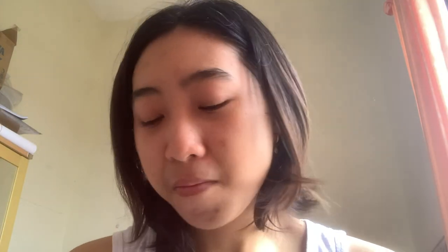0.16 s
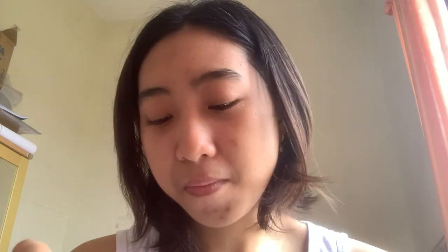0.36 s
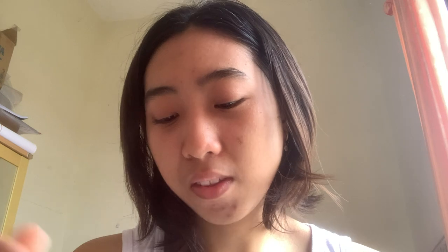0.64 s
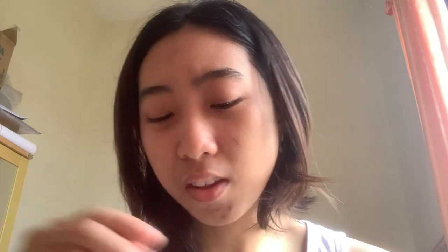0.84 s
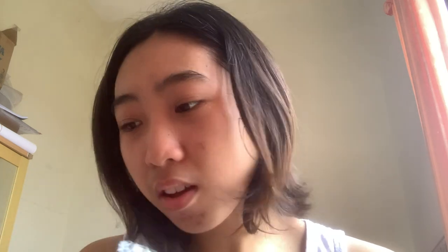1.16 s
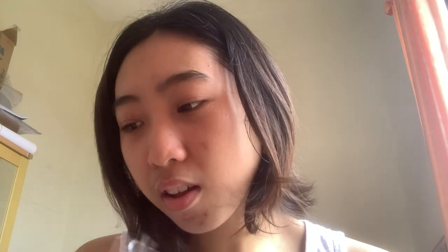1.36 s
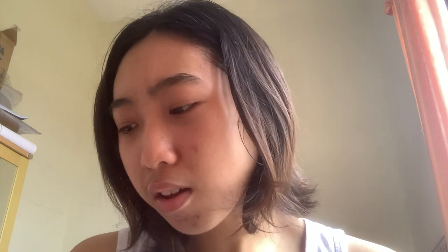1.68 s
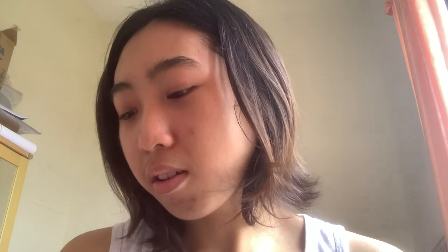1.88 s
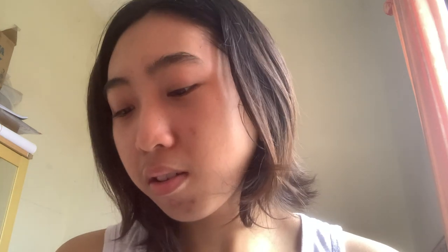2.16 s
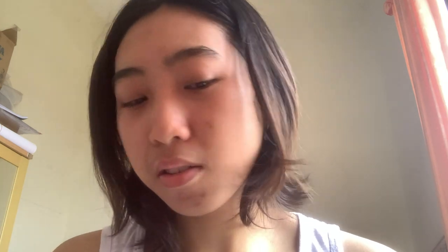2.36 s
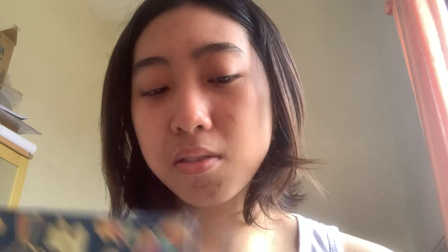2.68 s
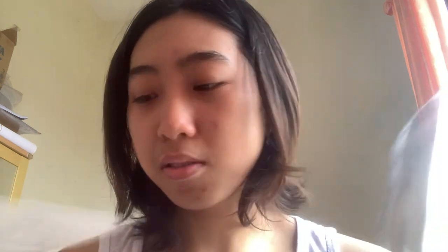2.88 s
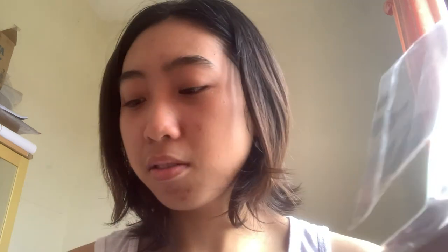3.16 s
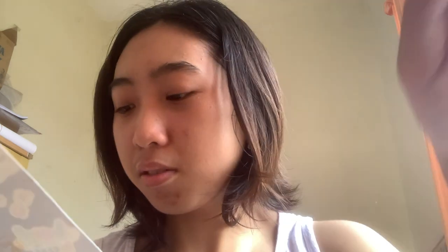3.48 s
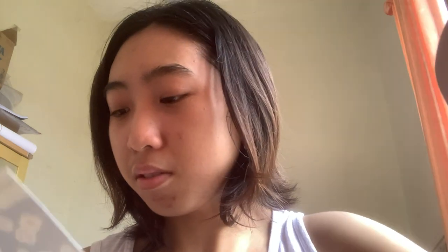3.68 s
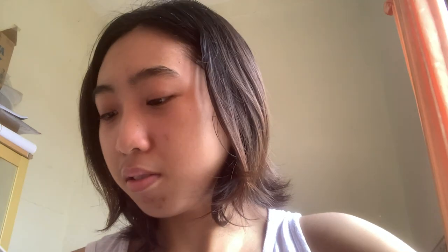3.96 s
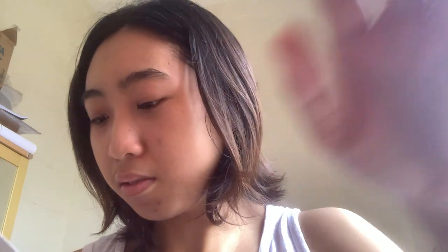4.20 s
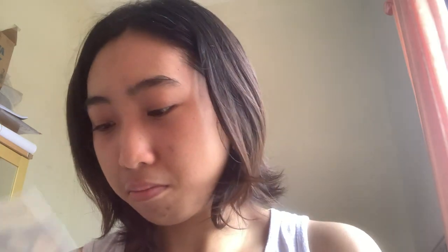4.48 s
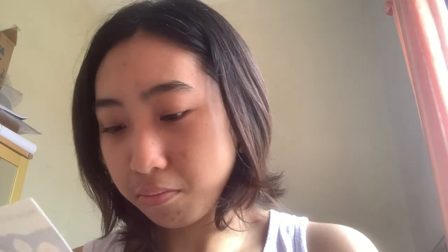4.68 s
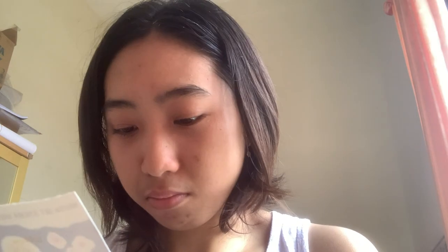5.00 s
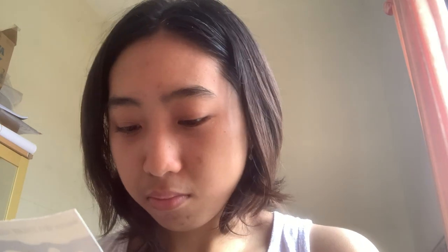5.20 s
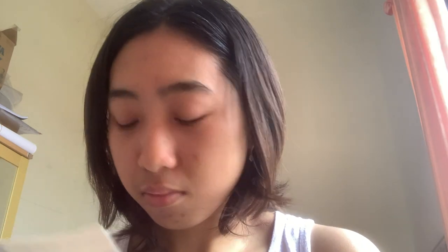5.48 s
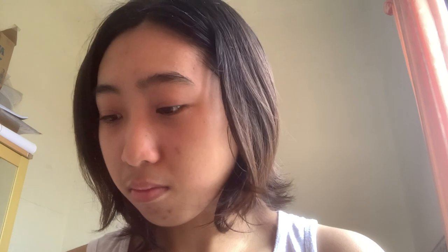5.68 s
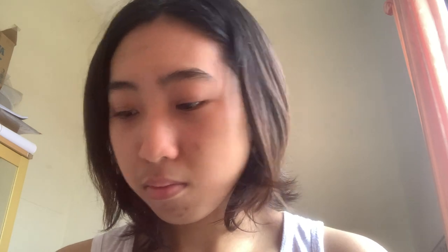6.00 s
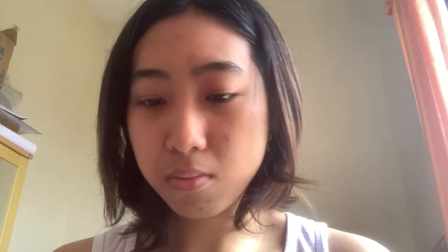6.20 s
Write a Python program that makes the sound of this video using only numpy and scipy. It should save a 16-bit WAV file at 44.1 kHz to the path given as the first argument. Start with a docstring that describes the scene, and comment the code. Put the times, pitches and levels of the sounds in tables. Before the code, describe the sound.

Close plastic sleeve tears and crinkles brightly, gets put aside to the right, leaving faint brushing and taps above a low rumble.

```python
"""Plastic sleeve torn open

Close up in a small room, quick pulls rip a sticky flap: dense noise slips through ringing modes.
Film crinkles as short damped pings and crackle; card knocks lower; a sticker sheet slides out as dense grain.
The sleeve is put aside to the right, and fingers tap (damped modes) and brush (soft grain) the sheet.
Below lie filtered-noise traffic and hiss, and sine tones for mains hum, a drone and three far engines."""
import sys
import numpy as np
from scipy import signal
from scipy.fft import rfft, irfft, next_fast_len
from scipy.io import wavfile
from scipy.ndimage import uniform_filter1d, map_coordinates

SR = 44100
rng = np.random.default_rng(int(sys.argv[2]) if len(sys.argv) > 2 else 0)


def write(x):
    x = np.atleast_2d(x).T
    wavfile.write(sys.argv[1], SR, np.round(np.clip(x, -1, 1) * 32767).astype(np.int16))


N = 279594

# colour of crackling film: frequency_hz, relative density_db (per Hz)
FILM_COLOUR = [(300, -27.5), (1200, -25.5), (2300, -9.5), (3200, -7.5), (4400, -6.5), (7300, 2), (9600, 3),
               (12000, -3.5), (15500, -4.5)]
# colour of the stiff card: frequency_hz, relative density_db (per Hz)
CARD_COLOUR = [(120, -20.5), (300, -7.5), (550, 2), (850, -1), (1200, -6.5), (1700, -3), (2400, -5.5),
               (2900, -13.5), (3700, -8), (9000, -31)]
TOP_HZ = 15900  # upper band limit
PULL_ATTACK_S, PULL_RELEASE_S = 0.0009, 0.002  # exponential time constants
LEFT_RIGHT = np.array([[.5], [-.5]])  # splits a left-right difference over both channels


def amp(db):
    """Decibels to amplitude."""
    return 10 ** (np.asarray(db) / 20)


def unit(x):
    """Scale x to rms 1."""
    return x / np.sqrt(np.mean(x ** 2) + 1e-20)


def along(points, hz):
    """Interpolate (Hz, value) points on a log-frequency axis."""
    point_hz, value = np.transpose(points)
    return np.interp(np.log(hz + 1), np.log(point_hz + 1), value)


def curves(rows):
    """Interpolate each column after the time to one value per sample."""
    time_s, *columns = np.transpose(rows)
    return [np.interp(np.arange(N) / SR, time_s, column) for column in columns]


def wobble(rate):
    """A smooth random curve with rate knots a second."""
    knots = rng.standard_normal(int(N * rate / SR) + 4)
    return map_coordinates(knots, [np.arange(N) * rate / SR])


def noise(size=N):
    """Two unrelated white noises."""
    return rng.standard_normal((2, size))


def filtered(x, response):
    """Multiply the spectrum of x by a complex response of frequency."""
    size = next_fast_len(N + SR // 2)
    return irfft(rfft(x, size) * response(np.fft.rfftfreq(size, 1 / SR)), size)[..., :N]


def coloured(x, spectrum, size=8192):
    """Causal minimum-phase filter with this spectrum that keeps the power of white noise."""
    gain = unit(amp(along(spectrum, np.fft.rfftfreq(size, 1 / SR))))
    cepstrum = irfft(np.log(gain))
    cepstrum[1:size // 2] *= 2  # fold the mirrored half forward in time
    cepstrum[size // 2 + 1:] = 0
    impulse_response = irfft(np.exp(rfft(cepstrum)))
    return signal.fftconvolve(x, impulse_response[None], axes=1)[:, :N]


def resonance(hz, centre_hz, width_hz):
    """Causal response of one mode, 1 at its centre."""
    return 1j * hz * width_hz / (centre_hz ** 2 - hz ** 2 + 1j * hz * width_hz)


def held(start, length, attack_s, release_s):
    """Rise exponentially up to the start, hold for the length, then decay exponentially."""
    t = np.arange(N) / SR - start
    exponent = np.minimum(t, 0) / attack_s - np.maximum(t - length, 0) / release_s
    return np.exp(np.maximum(exponent, -40))


def impulses(times, sizes):
    """A track with one spike of each size at each time."""
    return np.bincount(np.clip(np.asarray(times) * SR, 0, N - 1).astype(int), sizes, N)


def bursts(spikes, crack_t60, ring_t60, ring_db, size=4096):
    """Each spike becomes a noisy crack and a weaker, longer shiver."""
    t = np.arange(size) / SR
    power = amp(-60 * t / crack_t60) ** 2 + amp(ring_db - 60 * t / ring_t60) ** 2
    envelope = np.sqrt(np.abs(signal.fftconvolve(spikes ** 2, power)[:N]))
    return envelope * np.sign(noise())


def slips(rate, scatter, spread_db):
    """Spikes at an uneven rate with uneven sizes."""
    count = int(rate * N / SR)
    late, strength = rng.standard_normal((count, 2)).T
    times = ((np.arange(count) + scatter * late) / rate) % (N / SR)
    return impulses(times, amp(spread_db * np.clip(strength, -2, 2)))


def pings(s, gain, hz, life):
    """One short damped sine for each time, swelling to its peak at life and dying away."""
    t = np.arange(int(10 * life * SR)) / SR
    phase = rng.uniform(0, 2 * np.pi, (len(s), 2)).T[..., None]  # unrelated in the two channels
    envelope = gain[:, None] * t / life * np.exp(1 - t / life)
    waves = envelope * np.sin(2 * np.pi * hz[:, None] * t + phase)
    index = np.abs(s * SR).astype(int)[:, None] + np.arange(len(t))
    return np.array([np.bincount(index.ravel(), wave.ravel(), N)[:N] for wave in waves])


def pops(s, db, hz, life, detune, smear, count=6):
    """Each pop rings several patches of sheet, scattered in pitch, time and strength."""
    pitch, late, strength = rng.standard_normal((len(s), count, 3)).T
    share = amp(3.24 * strength) / np.linalg.norm(amp(2.5 * strength), axis=0)
    patch_hz = np.minimum(hz * np.exp(detune * pitch), TOP_HZ)
    return pings((s + smear * late).ravel(), (amp(db) * share).ravel(), patch_hz.ravel(), life)


def crackle(rate, low_hz, high_hz, life, spread_db):
    """Pings at random moments, each with its own pitch and size; rms 1."""
    count = int(rate * N / SR)
    when, pitch = rng.random((count, 2)).T
    gain = amp(spread_db * np.clip(rng.standard_normal(count), -2, 2))
    return unit(pings(when * N / SR, gain, low_hz + pitch * (high_hz - low_hz), life))


def creases(level_db, rate, spread_db):
    """Small creases give way at random moments, each with a pitch and size of its own."""
    count = int(rate * N / SR)
    when, pitch, strength = rng.random((count, 3)).T
    low_hz, high_hz = 2600, 14000
    local_db = level_db[(when * (N - 1)).astype(int)]
    db = local_db + spread_db * np.minimum(-np.log(1 - strength), 3)
    centre_hz = low_hz + pitch * (high_hz - low_hz)
    return pops(when * N / SR, db, centre_hz, life=0.00013, detune=0.12, smear=.0003, count=4)


def effort(grips):
    """Level in dB of overlapping grips; creases give way, so each sags while it is held."""
    attack_s, release_s = 0.0093, 0.022  # film crackles at once and settles slowly
    sag_db_per_s = 7.5
    t = np.arange(N) / SR
    power = 0
    for start, length, db in grips:
        sagging_db = db - sag_db_per_s * np.clip(t - start, 0, length)
        power = power + (amp(sagging_db) * held(start, length, attack_s, release_s)) ** 2
    return 10 * np.log10(power)


def tone(hz, waver):
    """A sine of rms 1 whose phase wanders a little."""
    phase = 2 * np.pi * np.cumsum(hz * np.ones(N)) / SR
    return np.sqrt(2) * np.sin(phase + waver * wobble(4.4))


def room(x):
    """Bare walls: each frequency of a noise tail dies at its own speed."""
    # decay of the room: frequency_hz, t60_s
    decay_times = [(200, 0.2), (2000, 0.55), (8000, 0.44), (15000, 0.397)]
    hz, t, z = signal.stft(noise(SR // 2), SR, nperseg=256)
    decay = amp(-60 * t / along(decay_times, hz)[:, None])
    tail = signal.istft(z * decay, SR, nperseg=256)[1]
    return signal.fftconvolve(x, tail / np.linalg.norm(tail[0]), axes=1)[:, :N]


def desk(x, count=9):
    """The desk and nearby things return weak copies within a few milliseconds."""
    delay_s, gain = rng.uniform(.0008, .009, count), rng.standard_normal(count)
    gain = gain / np.linalg.norm(gain)
    echoes = np.bincount(np.abs(delay_s * SR).astype(int), gain)
    return signal.fftconvolve(x, echoes[None], axes=1)[:, :N]


def ports(x):
    """Shared and unshared parts reach two microphone ports, differing in phase and level by frequency."""
    # likeness of the ports: frequency_hz, coherence (limited to 0-1 below)
    likeness = [(150, 1.5), (300, 0.42), (500, 0), (1000, 0.06), (1600, 0.3), (2400, 0), (6400, 0),
                (7300, 0.94), (9000, 0.8), (13000, 2.8), (14000, 1.2), (15000, 0.5)]
    # phase between the ports: frequency_hz, left_lead_rad (negative: left lags)
    phase_lead = [(50, .2), (130, .2), (250, 0), (650, -.9), (1000, 0), (1700, -.5), (2500, -.2),
                  (3200, -1.0), (3900, -.6), (5000, -2.4), (5900, -2.9), (6500, -3.85), (7300, -3.9),
                  (9200, -3.14), (11000, -1.8), (13300, -.15), (16000, .5)]
    # level between the ports: frequency_hz, left_minus_right_db
    balance = [(60, 1.5), (120, 4), (380, 2), (700, -2.5), (1300, -0.5), (4400, -1), (9000, 0)]

    def blend(hz):
        angle = np.arccos(np.clip(along(likeness, hz), 0, 1)) / 2
        return np.array([np.cos(angle), np.sin(angle)])

    def offset(hz):
        level = amp(LEFT_RIGHT * along(balance, hz))
        return level * np.exp(1j * LEFT_RIGHT * along(phase_lead, hz))

    shared, apart = filtered(x, blend)
    return filtered(np.array([shared + apart, shared - apart]), offset)


def to_the_right(x):
    """Below the treble, sound from the side reaches the right port first and louder."""
    # level between the ports: frequency_hz, left_minus_right_db
    side_balance = [(300, -9.5), (800, -1.5), (5300, -2.5), (6500, 0)]
    delay_s = .00036

    def offset(hz):
        lag = np.minimum(2 * np.pi * hz * delay_s, 4 * np.pi)  # whole turns above the limit: no lag
        return amp(LEFT_RIGHT * along(side_balance, hz)) * np.exp(-1j * LEFT_RIGHT * lag)

    return filtered(x, offset)


def ambience():
    """Filtered noise: traffic rumble ebbs and comes nearer, and a faint hiss partly follows it."""
    # traffic: time_s, rumble_db
    traffic = [(.15, -40), (.9, -37), (3.3, -38.5), (4.15, -40), (5.5, -37.5), (6.3, -36.5)]
    # colour of the rumble: frequency_hz, relative density_db (per Hz)
    rumble_colour = [(20, -46.5), (36, -16.5), (48, 0), (60, -4.5), (85, 1.5), (105, -2), (145, -3),
                     (180, -10.5), (250, -16), (350, -23), (600, -31.5), (1100, -45.5), (3000, -78.5)]
    # colour of the hiss: frequency_hz, relative density_db (per Hz)
    hiss_colour = [(300, -7.5), (1100, -5.5), (1700, -1), (2300, 2.5), (2900, -3), (3600, -11), (5500, -20),
                   (8000, -17), (11500, -21.5), (15500, -32.5)]
    hiss_base_db, hiss_follows = -67, .6  # the second is dB of hiss per dB of rumble
    rumble_db, = curves(traffic)
    hiss_db = hiss_base_db + hiss_follows * (rumble_db - rumble_db.mean()) + 0.73 * wobble(5)
    rumble = amp(rumble_db) * coloured(noise(), rumble_colour)
    return rumble + amp(hiss_db) * coloured(noise(), hiss_colour)


def engine(track):
    """Sines at multiples of a far engine's firing rate, dulled by the walls."""
    # engine orders: multiple_of_firing_rate (ratio), relative level_db
    orders = [(1, -1), (2, -1), (3, -6.5), (3.5, -2), (5, -2)]
    # what the walls let through: frequency_hz, gain_db
    walls = [(45, -14.5), (66, -0.5), (85, -0.5), (140, 1.5), (175, -2.5), (240, -10.5), (340, -18.5),
             (450, -22.5)]
    firing_hz, level_db = curves(track)
    total = np.zeros(N)
    for order, order_db in orders:
        hz = order * firing_hz
        total += amp(level_db + order_db + along(walls, hz)) * tone(hz, waver=.3)
    return total


def hum():
    """Wavering sines make mains hum and a drifting drone; three far engines join them."""
    # drone that swells and recedes: time_s, pitch_hz, level_db (before its sway)
    drone_track = [(.2, 118, -53), (.5, 119, -41), (1.0, 122, -47.5), (1.45, 123, -35), (1.75, 123, -47),
                   (2.05, 126, -39.5), (3.05, 124, -41), (3.8, 123, -49.5), (4.3, 119, -44),
                   (6.3, 119, -53)]
    # far engine running on and fading: time_s, firing_hz, level_db (before orders and walls)
    passing_engine = [(0, 80.2, -53.5), (.5, 81.89, -44.5), (.9, 83.83, -45.5), (1.2, 86, -47.5),
                      (2.2, 87.57, -46), (3.1, 86.68, -44.5), (3.5, 83.27, -49.5), (4.5, 83.1, -51),
                      (4.9, 82.5, -68)]
    # far engine pulling away, same columns: time_s, firing_hz, level_db
    leaving_engine = [(4.3, 46.23, -55), (4.5, 52.89, -43.5), (4.65, 67.38, -43.5), (4.8, 77.86, -42),
                      (5.0, 84.6, -43), (5.3, 85.34, -52.5), (6.34, 85.34, -49)]
    # far engine at a nearly steady speed, same columns: time_s, firing_hz, level_db
    cruising_engine = [(4.6, 63.65, -55.5), (4.95, 65.86, -56), (5.4, 67.54, -39.5), (6.34, 69.26, -46)]
    drone_hz, drone_db = curves(drone_track)
    drone = amp(drone_db + 3.5 * wobble(5.5)) * tone(drone_hz, waver=0.15)
    mains_tones = tone(49.5, waver=0.69) + amp(-4) * tone(99, waver=0.94)
    mains = amp(-44 + 5.5 * wobble(2.7)) * mains_tones
    engines = engine(passing_engine) + engine(leaving_engine) + engine(cruising_engine)
    return np.array([mains + drone + engines, np.zeros(N)])  # all in the shared part


def taps(size=4096):
    """A fingertip gives a hard nail click and damped modes of the stiff sheet, weighted by pitch."""
    # taps: time_s, knock_db (before mode and mix gains), centre_hz, click_db
    tap_events = [(4.5291, -28.5, 948.5, -33.5), (6.0806, -35.5, 1915, -52), (6.102, -31.5, 1643, -45.5)]
    # modes of the sheet: frequency_hz, relative level_db, t60_s
    sheet_modes = [(570, -3.5, 0.034), (1063, -2.5, 0.015), (1602, -3, 0.013), (2016, -2, 0.017),
                   (2520, -13.5, 0.011)]
    # colour of the nail's click: frequency_hz, relative density_db (per Hz)
    nail_colour = [(300, -8.5), (900, 2.5), (2200, 2.5), (3700, -13), (5500, -7.5), (9000, -18),
                   (15500, -13.5)]
    reach_octaves = 1.0  # how far around its centre a tap excites the sheet
    t = np.arange(size) / SR
    s, knock_db, centre_hz, click_db = np.transpose(tap_events)
    knock = np.zeros(N)
    for hz, db, t60 in sheet_modes:
        weight = amp(knock_db + db) * np.exp(-(np.log2(hz / centre_hz) / reach_octaves) ** 2)
        ring = amp(-60 * t / t60) * np.sin(2 * np.pi * hz * t)
        knock += signal.fftconvolve(impulses(s, weight), ring)[:N]
    click = bursts(impulses(s, amp(click_db)), crack_t60=.003, ring_t60=.03, ring_db=-23.5)
    return knock * amp([[-4], [-14]]) + coloured(click, nail_colour)  # knock mostly shared


def slides():
    """Rubbing surfaces: slips so dense that they hiss; each stroke gathers speed and stops sooner."""
    # sheet on film, then fingertips on sheet: fastest_s, run_up_s, level_db (before mix gains)
    strokes = [(2.45, 0.024, -53.5), (2.67, 0.21, -36), (5.505, 0.06, -67), (5.785, 0.035, -70.5)]
    # swishes of the sheet turned in the hands: start_s, length_s, level_db (before smoothing)
    swish_events = [(4.21, 0.022, -70), (5.29, 0.045, -74), (5.45, .065, -66), (5.765, 0.03, -73),
                    (5.86, 0.035, -70.5), (6.05, .07, -71.5), (6.24, 0.033, -77)]
    # colour of the swish: frequency_hz, relative density_db (per Hz)
    swish_colour = [(500, -10), (1500, 3.5), (3000, -3.5), (6000, -1), (7500, -2), (10000, -13),
                    (15500, -18)]
    # colour of the brushing: frequency_hz, relative density_db (per Hz)
    finger_colour = [(500, 1), (1500, -8.5), (2300, -24), (2900, -17.5), (3800, -5), (5000, -7),
                     (7000, -0.5), (11000, -0.5), (13000, -2.5), (15500, -3)]
    stop_share = 0.36  # stopping time as a share of the run-up
    t = np.arange(N) / SR
    stroke = np.zeros(N)
    for fastest_s, run_up, db in strokes:
        span = np.where(t < fastest_s, run_up, stop_share * run_up)
        stroke += amp(db) * np.exp(-((t - fastest_s) / span) ** 2)
    grain = crackle(rate=5000, low_hz=606, high_hz=15750, life=0.00017, spread_db=2.5)
    rub = stroke * amp(1.0 * wobble(70)) * grain
    turning = uniform_filter1d(amp(effort(swish_events)), size=2600)  # gradual start and stop
    swish = coloured(turning * amp(1.8 * wobble(60)) * grain, swish_colour)
    catching = amp(-16.5 + 5 * wobble(55))  # the card catches and frees itself
    return amp(-1.5) * coloured(rub, finger_colour) + catching * coloured(rub, CARD_COLOUR) + swish


def flaps():
    """The stiff card bows or is tapped: a dull, quickly damped knock with a papery slap."""
    # card knocks: time_s, knock_db (before part gains), centre_hz, bow_db (whole card bending)
    card_events = [(.117, -12.5, 2100, -38), (.211, -28.5, 2142, -48.5), (.269, -18.5, 1736, -25.5),
                   (0.287, -30.5, 696, -30), (.33, -25, 1890, -47.5), (0.342, -26, 1790, -44),
                   (0.355, -20, 1966, -42), (0.43, -20.5, 1672, -29), (.447, -26.5, 800, -29),
                   (.484, -25.5, 1030, -32), (.502, -29, 750, -35.5), (0.993, -31.5, 808, -39),
                   (1.243, -24, 1390, -33.5), (1.782, -31.5, 1500, -44), (1.81, -21, 1000, -37),
                   (1.927, -29.5, 650, -32.5), (2.029, -23, 1580, -32), (2.08, -31.5, 1724, -44.5),
                   (2.109, -33.5, 1790, -45), (3.684, -31.5, 1780, -30), (3.711, -28, 1940, -41),
                   (3.809, -32, 1700, -42), (6.077, -33, 1700, -58)]
    s, knock_db, hz, bow_db = np.transpose(card_events)
    s = s + .001  # the card gives way just after the touch
    knock = pops(s, knock_db - 4.0, hz, life=0.0006, detune=.24, smear=0.0017, count=12)
    slap_spikes = impulses(s, amp(knock_db - 9.0))
    slap = bursts(slap_spikes, crack_t60=0.015, ring_t60=0.12, ring_db=-10.5)
    bow = pops(s, bow_db, 470, life=0.0012, detune=0.39, smear=.002)
    return knock + bow + coloured(slap, CARD_COLOUR)


def rustle():
    """Worked film sheds fine crackle and separate small pops in fits and starts; the card crumples lower."""
    # grips of the hands: start_s, length_s, rustle_db, crumple_db (both before mix gains)
    hand_grips = [(0.285, 0.1, -42, -50), (0.422, 0.072, -34.5, -39), (0.551, 0.075, -41.5, -48),
                  (0.701, .01, -54, -53.5), (0.994, 0.023, -41, -46.5), (1.075, 0.25, -50, -54.5),
                  (1.342, 0.16, -50.5, -55.5), (1.512, 0.094, -60.5, -57.5), (1.639, 0.079, -48.5, -53.5),
                  (1.749, 0.058, -43, -47), (1.856, 0.19, -51.5, -59), (1.996, 0.2, -47.5, -54),
                  (2.224, 0.082, -48.5, -58.5), (2.343, 0.096, -41, -50.5), (2.512, 0.27, -46, -55.5),
                  (2.818, 0.046, -49, -62), (3.06, 0.038, -63, -60.5), (3.268, 0.2, -53.5, -62.5),
                  (3.654, 0.012, -50, -55), (3.688, 0.058, -53, -53), (3.875, 0.012, -49, -47.5),
                  (3.965, 0.009, -68, -54.5)]
    # slack sleeve creeping between moves: start_s, length_s, level_db (before mix gains)
    creep_events = [(2.9, 0.27, -65), (3.22, 0.2, -66.5), (3.52, 0.079, -64.5)]
    grips = np.array(hand_grips)
    fits_db = 3.5 * wobble(45)
    film_db = effort(grips[:, :3]) + fits_db
    body_db = effort(np.delete(grips, 2, axis=1)) + 0.26 * fits_db + 2.5 * wobble(70)
    creep_db = effort(creep_events)
    fine = crackle(rate=3900, low_hz=988, high_hz=15600, life=0.00018, spread_db=1.5)
    tick_spikes = slips(rate=97, scatter=0.89, spread_db=2.5)
    ticks = unit(bursts(tick_spikes, crack_t60=0.0024, ring_t60=0.017, ring_db=-12))
    crumple = crackle(rate=1500, low_hz=200.1, high_hz=3870, life=0.00064, spread_db=2.5)
    film = (amp(film_db) + amp(creep_db)) * amp(-2.5) * (fine + ticks)
    film += creases(film_db + 2.5, rate=120, spread_db=4.5)
    body_level = amp(body_db) + amp(creep_db - 1.5)  # slow creeping also crumples low
    body = body_level * (crumple + amp(-11.0) * ticks)
    return coloured(film, FILM_COLOUR) + amp(-6.0) * coloured(body, CARD_COLOUR)


def snaps():
    """A crease pops with a bright tick amid a ragged run of smaller ones, and shakes the sheet around it."""
    # loudest creases: time_s, snap_db (before part gains), centre_hz, flex_db (flexing sheet)
    crease_events = [(.213, -20.5, 9000, -39), (.232, -13.5, 6960, -22.5), (.3305, -19.5, 11440, -41.5),
                     (.347, -16, 10880, -32.5), (0.3555, -7, 12520, -32), (0.365, -19, 7010, -38),
                     (.418, -16, 12000, -42), (0.4249, -10, 6916, -29), (0.4293, -17, 10980, -34),
                     (0.433, -6.5, 9130, -23.5), (0.4383, -4.5, 10010, -28), (0.4422, -5, 9400, -18),
                     (0.466, -11.5, 10950, -30.5), (0.4758, -12, 10150, -32), (0.4792, -12, 11930, -33),
                     (0.4947, -14.5, 9060, -34.5), (.5127, -12, 11630, -35), (.546, -16, 11430, -32.5),
                     (0.5747, -18.5, 12970, -36), (.5952, -19, 9120, -35.5), (0.6, -17.5, 10300, -26.5),
                     (0.6141, -16.5, 9940, -44), (0.6242, -7, 10150, -30.5), (0.698, -29, 7980, -40.5),
                     (0.7483, -23.5, 10800, -45.5), (0.9919, -15, 7170, -27.5), (1.004, -19, 6990, -28),
                     (1.0226, -15, 8810, -28.5), (1.0506, -18.5, 10950, -51.5),
                     (1.0608, -21.5, 11680, -50.5), (1.087, -16, 9850, -49.5), (1.1331, -11.5, 7600, -42),
                     (1.1672, -20.5, 8540, -36.5), (1.2081, -23, 11970, -55), (1.2473, -28, 4664, -38),
                     (1.331, -15.5, 8950, -36), (1.3356, -17, 5900, -27.5), (1.3461, -22.5, 8726, -58.5),
                     (1.4066, -19.5, 8660, -40.5), (1.4197, -19, 10700, -48), (1.5282, -25, 12300, -54),
                     (1.5347, -16, 8820, -37.5), (1.556, -18.5, 12400, -56), (1.5842, -16, 9130, -57.5),
                     (1.6739, -19.5, 10680, -48.5), (1.7549, -14.5, 7050, -35.5),
                     (1.7614, -31.5, 4930, -29), (1.7675, -5.5, 10250, -28), (1.8109, -21, 5040, -22),
                     (1.821, -15.5, 9080, -36), (1.9181, -20.5, 9700, -52.5), (1.9245, -18, 10650, -34),
                     (1.9454, -23.5, 10200, -43.5), (1.9924, -17, 11240, -28.5),
                     (2.0233, -11.5, 8140, -37.5), (2.0316, -17, 7300, -19), (2.0427, -13.5, 11430, -47.5),
                     (2.1265, -21.5, 9800, -51), (2.143, -15.5, 9870, -46.5), (2.1789, -16.5, 7060, -44),
                     (2.1847, -17, 7850, -54), (2.2577, -11, 8200, -28.5), (2.3231, -16.5, 10900, -39),
                     (2.3509, -20, 13000, -50), (2.356, -16, 11000, -46), (2.3654, -12.5, 10670, -56),
                     (2.3707, -18.5, 9890, -40.5), (2.3808, -29, 11000, -43.5), (2.3917, -8, 11520, -36.5),
                     (2.398, -10.5, 9000, -31), (2.411, -11, 7460, -34.5), (2.428, -13.5, 9200, -38),
                     (2.509, -19, 13000, -31.5), (2.7264, -19, 10950, -42.5), (2.7724, -20, 6600, -38),
                     (2.8249, -18, 10050, -55), (2.8343, -20.5, 8600, -34), (2.8685, -25.5, 5770, -40.5),
                     (2.9506, -29.5, 7240, -41.5), (3.043, -32.5, 9700, -36), (3.0701, -24, 7600, -53.5),
                     (3.0883, -27.5, 8300, -56.5), (3.237, -38.5, 6760, -43), (3.275, -23, 7820, -51),
                     (3.2904, -31, 10000, -56), (3.296, -15.5, 12100, -45), (3.3535, -15, 10000, -48),
                     (3.3911, -15.5, 10400, -33.5), (3.4242, -19.5, 10680, -36), (3.4342, -22, 9800, -40),
                     (3.6435, -28, 6000, -38), (3.659, -22, 11050, -46), (3.6753, -20, 10050, -44),
                     (3.683, -8.5, 8200, -38.5), (3.6863, -15.5, 5140, -28), (3.713, -25, 4520, -37),
                     (3.7445, -15, 5160, -39), (3.7825, -22, 8300, -37), (3.8084, -22, 6800, -44),
                     (3.828, -27.5, 5100, -48.5), (3.8864, -24, 6200, -46), (3.8909, -23, 6400, -36.5),
                     (6.1, -37.5, 11100, -56)]
    s, snap_db, hz, flex_db = np.transpose(crease_events)
    tick = pops(s, snap_db - 2.5, hz, life=.0001, detune=0.3, smear=.0002)
    crack_spikes = impulses(s, amp(snap_db - 13.5))
    crack = bursts(crack_spikes, crack_t60=0.0036, ring_t60=0.022, ring_db=-4.5)
    run = pops(s, snap_db - 9.5, hz, life=0.00025, detune=0.092, smear=.0006)
    neighbours = pops(s, snap_db - 18.5, hz, life=.0001, detune=0.91, smear=0.018, count=4)
    flex = pops(s, flex_db, 1470, life=0.00031, detune=.55, smear=0.00079, count=8)
    return tick + coloured(crack, FILM_COLOUR) + run + neighbours + flex


def sleeve(x):
    """Film hanging slack adds a broad resonance that makes its crackle lower."""
    # slackness once the card is out: time_s, slackness (0-1)
    slackness = [(2.8, 0.16), (3.2, 0.97)]
    slack = np.clip(curves(slackness)[0], 0, 1)
    return x + filtered(x * slack, lambda hz: amp(1.0) * resonance(hz, centre_hz=3600, width_hz=1640))


def peel(start, length, db):
    """Force of one pull: the glue resists most as it first gives way and as its last strip lets go."""
    grab_db, grab_s = 4.5, 0.008
    last_db, last_s = 8, 0.013
    t = np.clip(np.arange(N) / SR - start, 0, length)
    surge_db = grab_db * np.exp(-t / grab_s) + last_db * np.exp((t - length) / last_s)
    return amp(db + surge_db) * held(start, length, PULL_ATTACK_S, PULL_RELEASE_S)


def rips():
    """Glue lets go in hundreds of tiny slips a second; the taut flap rings and tugs the card."""
    # pulls: start_s, length_s, level_db (before surge and mix), flap_pitch (ratio), tug_db (before rise and mix)
    pulls = [(0.0231, 0.099, -14, 1.0, -38), (0.248, .015, -16, 1.08, -25.5),
             (0.269, 0.011, -28, 0.92, -27.5)]
    # colour of the tearing glue: frequency_hz, relative density_db (per Hz)
    adhesive_colour = [(120, -32.5), (400, -16), (1000, -11.5), (1600, -9.5), (2350, -7), (3100, -10),
                       (5000, -4.5), (7500, 1.5), (9200, -1), (11500, -1), (15500, -4)]
    # ringing of the taut flap: frequency_hz (before pitch ratio), width_hz, level_db
    flap_modes = [(899, 130, 0.5), (1650, 270, 0), (2388, 150, 7), (3860, 350, -3), (11300, 450, -1.5)]
    tug_rise_db, tug_s = 5, 0.035  # the card is dragged along more as a pull ends
    t = np.arange(N) / SR
    out = np.zeros((2, N))
    for start, length, db, pitch, tug_db in pulls:
        def flap(f):
            return 1 + sum(amp(mode_db) * resonance(f, pitch * hz, width) for hz, width, mode_db in flap_modes)

        glue_slips = slips(rate=900, scatter=0.35, spread_db=2.0)
        tearing = unit(bursts(glue_slips, crack_t60=0.0033, ring_t60=0.0094, ring_db=-5.0))
        force = peel(start, length, db)
        rise_db = tug_rise_db * np.exp(np.minimum(t - start - length, 0) / tug_s)
        drag = amp(tug_db + rise_db) * held(start, length, PULL_ATTACK_S, PULL_RELEASE_S)
        out += amp(-2.5) * filtered(coloured(force * tearing, adhesive_colour), flap)
        out += amp(-11.0) * coloured(drag * tearing, CARD_COLOUR)
    # the first pull starts with a squeak
    squeak = unit(filtered(noise(), lambda f: resonance(f, centre_hz=10900, width_hz=910) ** 2))
    squeak_envelope = held(pulls[0][0], 0.0099, PULL_ATTACK_S, PULL_RELEASE_S)
    return out + amp(-12.5) * squeak_envelope * squeak


def scene():
    """The handled plastic above a desk in its room, over the hum; the hand carries it right and back."""
    # place of the handled sleeve: time_s, share_of_the_way_right (0-1)
    hand_path = [(2.95, 0.01), (3.2, 1), (4.05, 0.94), (4.4, 0.17)]
    hands = rips() + sleeve(snaps() + rustle()) + flaps() + taps() + slides()
    direct = (hands + amp(-13.5) * desk(hands)) * amp([[0], [-3.5]])  # less of the unshared part
    aside = np.clip(curves(hand_path)[0], 0, 1)
    ahead = ports(direct * (1 - aside) + amp(-15.5) * room(hands) + ambience() + hum())
    return ahead + to_the_right(ports(direct * aside))


def record(dry):
    """Clip at full scale, fade both ends within milliseconds and cut steeply above the band limit."""
    faded = np.clip(dry, -1, 1) * signal.windows.tukey(N, .003)
    return filtered(faded, lambda hz: 1 / np.sqrt(1 + (hz / TOP_HZ) ** 220))


dry = scene()
out = record(dry)
write(out)
```